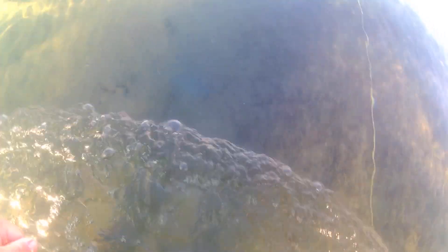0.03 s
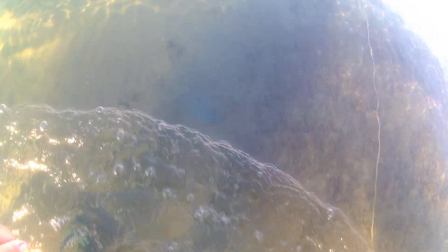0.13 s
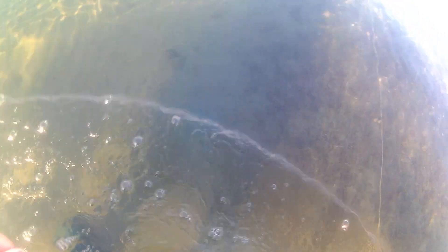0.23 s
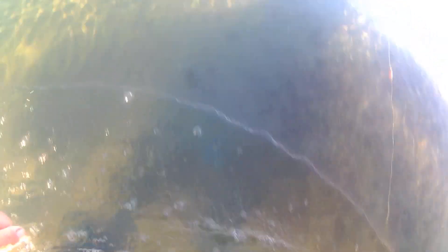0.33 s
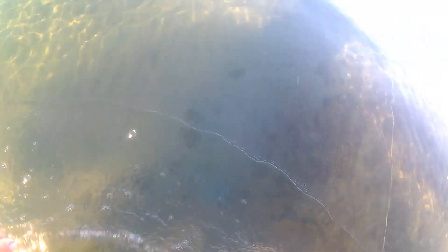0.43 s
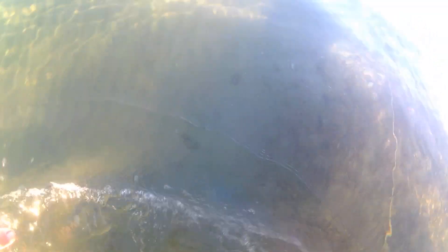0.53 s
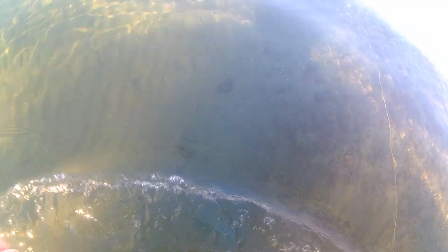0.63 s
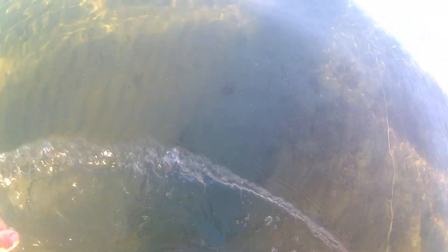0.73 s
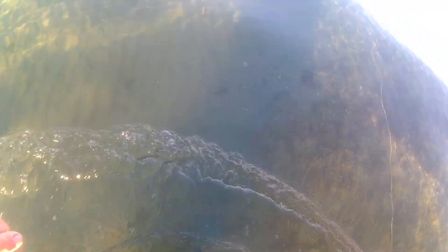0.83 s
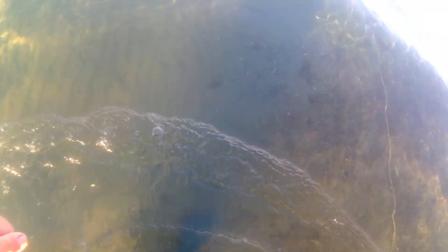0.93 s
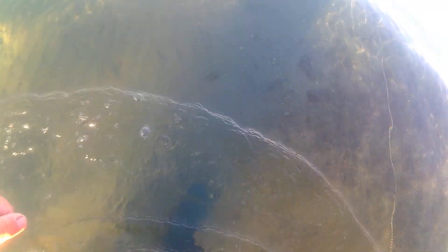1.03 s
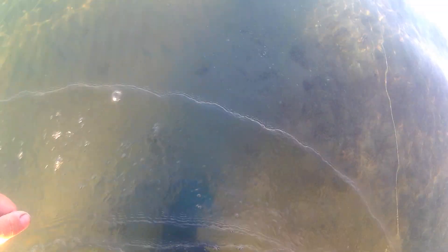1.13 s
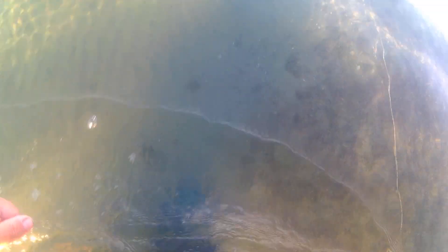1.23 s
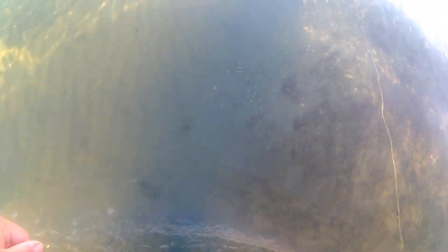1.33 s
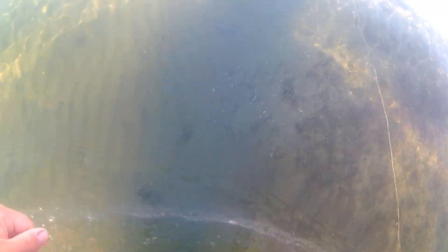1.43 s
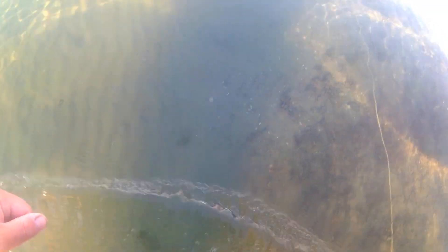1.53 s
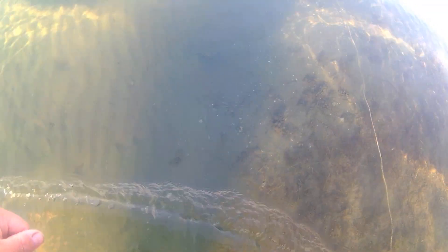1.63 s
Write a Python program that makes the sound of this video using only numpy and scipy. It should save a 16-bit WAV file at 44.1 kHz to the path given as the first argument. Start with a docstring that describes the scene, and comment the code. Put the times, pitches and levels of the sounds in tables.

```python
"""Small waves slap a waterproof camera held at the sea's surface, the microphone inside its housing.
Each slap is a dull thud, a hollow shell tone, a short ring of trapped air and a sharp click, all summed
from decaying modes, with a noisy crack and a little spray. Larger air pockets gulp and single bubbles drip.
Behind them are trickling water (random drops and noise), a low slosh, hiss and a faint hum and whine."""
import sys
import numpy as np
from scipy import signal
from scipy.fft import rfft, irfft, next_fast_len
from scipy.io import wavfile
from scipy.ndimage import map_coordinates

SR = 44100
rng = np.random.default_rng(int(sys.argv[2]) if len(sys.argv) > 2 else 0)


def digitize_waveform(pressure):
    """Quantize a signal to 16-bit integers and store it at the path in sys.argv[1].

    Rows of a 2-D input are taken as channels; values are limited to [-1, 1].
    """
    field = np.atleast_2d(pressure).T
    bounded = np.clip(field, -1, 1)
    quanta = np.round(bounded * 32767).astype(np.int16)
    wavfile.write(sys.argv[1], SR, quanta)


N = 74970  # length in samples, 1.7 s


def amp(db):
    """Decibels to gain."""
    return 10 ** (np.asarray(db) / 20)


def unit(x):
    """Scale to rms 1."""
    return x / np.sqrt(np.mean(x ** 2) + 1e-20)


def filtered(x, response):
    """Multiply the spectrum of x by a response of frequency."""
    size = next_fast_len(N + SR // 2)
    return irfft(rfft(x, size) * response(np.fft.rfftfreq(size, 1 / SR)), size)[:N]


def response_db(hz, points):
    """Level at each frequency, interpolated on a log scale between (Hz, dB) points."""
    point_hz, point_db = np.transpose(points)
    return np.interp(np.log(hz + 1), np.log(point_hz), point_db)


def coloured(x, points):
    """Shape x by a (Hz, dB) spectrum, at rms 1."""
    return unit(filtered(x, lambda hz: amp(response_db(hz, points))))


def noise(points):
    """Fresh noise with a (Hz, dB) spectrum, at rms 1."""
    return coloured(rng.standard_normal(N), points)


def causal(x, points):
    """Pass x through a minimum-phase filter with a (Hz, dB) response, so nothing sounds early."""
    size = 2048
    cepstrum = irfft(np.log(amp(response_db(np.fft.rfftfreq(size, 1 / SR), points))))
    # folding the cepstrum onto positive time gives minimum phase
    cepstrum[1:size // 2] *= 2
    cepstrum[size // 2 + 1:] = 0
    impulse_response = irfft(np.exp(rfft(cepstrum)))
    return signal.fftconvolve(x, impulse_response)[:N]


def wobble(rate):
    """A smooth random curve, rate knots a second."""
    return map_coordinates(rng.standard_normal(N // 20), [np.arange(N) * rate / SR])


def since(s):
    """Seconds since time s, zero before."""
    return np.maximum(np.arange(N) / SR - s, 0)


def swell(t, rise, t60):
    """Rise and exponential decay, peak 1."""
    envelope = (1 - np.exp(-t / rise)) * np.exp(-np.log(1000) * t / t60)
    return envelope / (envelope.max() + 1e-20)


def ring(t, hz, t60, cycles):
    """One resonant mode, building up over a few cycles and dying away."""
    return swell(t, cycles / hz, t60) * np.sin(2 * np.pi * hz * t)


# Spectrum of the recorder's hiss. Each row: frequency in Hz, relative level in dB.
HISS_SPECTRUM = [(100, -6.5), (2000, 3), (4000, -1), (8000, -3.5), (12000, -2.5), (15600, -3.5),
                 (16100, -26.5)]
HISS_DB = -67.5


def hiss():
    """The recorder's steady noise floor, as coloured noise."""
    return amp(HISS_DB) * noise(HISS_SPECTRUM)


# Faint electronic hum and whine. Each row: frequency in Hz, rms level in dB.
WHINE_TONES = [(60, -71.5), (9295, -88), (9374, -86), (9454, -83), (9534, -86.5)]
WHINE_DRIFT = 0.6  # phase wander in radians


def hum_and_whine():
    """Steady electronic sines whose phases wander slowly."""
    total = np.zeros(N)
    for hz, db in WHINE_TONES:
        start_phase = rng.uniform(0, 2 * np.pi)
        phase = 2 * np.pi * hz * since(0) + start_phase + WHINE_DRIFT * wobble(6.7)
        total += amp(db) * np.sqrt(2) * np.sin(phase)
    return total


# Spectrum of the water moving round the case. Each row: frequency in Hz, relative level in dB.
SLOSH_SPECTRUM = [(20, -7.5), (45, -2.5), (60, -4.5), (80, -6), (150, -5), (250, -11), (400, -12.5),
                  (900, -19), (2000, -27), (4000, -46)]
SLOSH_DB = -64


def slosh():
    """Even, low rumble of water moving round the case, as coloured noise."""
    return amp(SLOSH_DB) * noise(SLOSH_SPECTRUM)


# Level of the running water close along the case. Each row: time in seconds, level in dB.
TRICKLE_LEVEL = [(0, -72.5), (.15, -62.5), (.19, -63), (.28, -63.5), (.31, -58), (.5, -58.5), (.58, -67.5),
                 (0.701, -68), (.82, -58.5), (.89, -63.5), (.97, -59.5), (1.12, -63), (1.2, -67),
                 (1.28, -54.5), (1.33, -65.5), (1.46, -75.5), (1.55, -65.5), (1.611, -77), (1.7, -72)]
# Its spectrum at the microphone. Each row: frequency in Hz, relative level in dB.
TRICKLE_SPECTRUM = [(100, -21), (170, -6), (240, 3), (330, -20), (600, -22), (900, -2.5), (1150, -15),
                    (1450, -5), (1680, 7), (1820, -2.5), (2100, -22.5), (4000, -20), (7000, -33.5)]
DROPS_PER_S, DROP_SPREAD_DB = 840, 4
DROP_SHARE = 0.36  # drops' share of the power before colouring, the rest is smooth running water


def trickle():
    """Tiny drops as random impulses over the noise of running water, rising and falling in level."""
    falls = rng.random(N) < DROPS_PER_S / SR
    polarity = rng.choice([-1, 1], N)
    drops = falls * polarity * amp(DROP_SPREAD_DB * rng.standard_normal(N))
    running = rng.standard_normal(N)
    water = np.sqrt(DROP_SHARE) * unit(drops) + np.sqrt(1 - DROP_SHARE) * running
    s, db = np.transpose(TRICKLE_LEVEL)
    return amp(np.interp(since(0), s, db)) * coloured(water, TRICKLE_SPECTRUM)


# Single drips that ring only a small bubble. Each row: start in seconds, level in dB, pitch in Hz.
BUBBLE_DRIPS = [(.295, -49, 1707), (1.077, -45, 1688), (1.229, -53.5, 1730), (1.26, -47, 1547),
                (1.271, -42.5, 1716), (1.2985, -44.5, 1716)]
DRIP_T60_S, DRIP_RISE_CYCLES = 0.01237, 9.7


def drips():
    """Soft blips of single bubbles, each one short resonance."""
    return sum(amp(db) * ring(since(s), hz, DRIP_T60_S, DRIP_RISE_CYCLES) for s, db, hz in BUBBLE_DRIPS)


# Gulps of larger air pockets under the case.
# Each row: start in seconds, level in dB, pitch in Hz, decay time t60 in seconds.
AIR_GULPS = [(0.2289, -48.5, 245.5, 0.16), (0.2482, -40, 242.3, 0.0893), (0.3293, -38, 226.9, 0.091),
             (0.525, -49, 229.3, 0.0525), (0.6313, -48, 211, 0.0335), (1.2787, -33.5, 209.8, 0.0503),
             (1.2954, -39, 206.9, 0.104)]
GULP_RISE_CYCLES = 0.401


def gulps():
    """Low, round rings of air trapped by a wave, each one decaying mode."""
    return sum(amp(db) * ring(since(s), hz, t60, GULP_RISE_CYCLES) for s, db, hz, t60 in AIR_GULPS)


# Antiresonances of the housing. Each row: centre in Hz, width in Hz.
HOUSING_NOTCHES = [(681, 160), (1151, 110), (3281, 430), (5701, 590)]
STIFF_BELOW_HZ = 645  # the stiff shell radiates little below this


def through_housing(x):
    """The stiff case notches a few bands and cuts the lows."""
    for hz, width in HOUSING_NOTCHES:
        x = signal.lfilter(*signal.iirnotch(hz, hz / width, fs=SR), x)
    low_cut = signal.butter(4, STIFF_BELOW_HZ, "high", fs=SR, output="sos")
    return signal.sosfilt(low_cut, x)


# Modes of the housing, by part. Each row: frequency in Hz, relative level in dB, decay time t60 in seconds.
HOUSING_MODES = { "thud": [(110.4, -4, 0.029), (551, -12.5, 0.074), (629, -4.5, 0.1767)],
                 "shell": [(840.3, -9, 0.025), (930.1, -0.75, 0.01769)], "wall": [(1402.6, -1.25, 0.017),
                 (1566.7, 6.5, 0.012)], "click": [(2363.4, -8.5, 0.0072), (2655, -13, 0.0044),
                 (3439, -8.5, 0.0086), (3921, -6, 0.0092), (4000, -38.5, 0.0652), (4025, -11, 0.0093),
                 (4857, -15, 0.0125), (6383, -34, 0.0093), (7158, -20.5, 0.0029)]}
# Build-up of each part's rings and of the air ring, in cycles of the mode.
BUILD_UP_CYCLES = {"thud": 0.57, "shell": 3.1, "wall": 2.3, "air": 22, "click": 6.2}


def part_ring(t, part):
    """All the modes of one part of the housing, rung together."""
    return sum(amp(db) * ring(t, hz, t60, BUILD_UP_CYCLES[part]) for hz, db, t60 in HOUSING_MODES[part])


# Waves slapping the case, right at the microphone; all but the thud are levels before the filters.
# Each row: start in seconds, thud in dB, shell in dB, wall in dB, air ring in dB, air ring in Hz,
# click in dB, crack in dB.
WAVE_SLAPS = [(0.228, -45, -32, -44.5, -23.5, 1659, -59, -54.5),
              (0.2321, -62.5, -52, -49, -31, 1646, -65, -59),
              (0.2486, -62.5, -28, -31.5, -25, 1802, -36.5, -67),
              (0.2513, -47, -39.5, -42.5, -25.5, 1716, -63, -55.5),
              (0.3275, -43, -23, -29.5, -7, 1787, -13, -28),
              (0.5252, -62, -44.5, -43, -32.5, 1814.3, -47, -63.4),
              (0.631, -65, -50, -67.5, -61, 1684.7, -70.5, -77),
              (1.1624, -54, -22, -26, -24, 1802, -23.5, -32.5),
              (1.1681, -69, -43.5, -40, -39.5, 1715, -52, -56),
              (1.2774, -44.5, -27, -34, -39.5, 1792, -37, -41.5),
              (1.5596, -65.5, -37.3, -39.5, -28, 1859, -42, -49),
              (1.5651, -66.5, -57.5, -48.5, -45.5, 1787, -62, -71)]
# Response shaping the crack. Each row: frequency in Hz, gain in dB.
CRACK_RESPONSE = [(300.0, -34), (800.0, -30), (2200.0, 11.5), (5000.0, 1.85), (8000.0, -12),
                  (12000.0, -17.5), (16000.0, -15)]
# Spectrum of spray falling back after a slap. Each row: frequency in Hz, relative level in dB.
SPRAY_SPECTRUM = [(100, -28), (250, 3.5), (400, -16.5), (800, 1), (1100, -2), (1400, 10), (1800, 8.5),
                  (2150, -15.5), (4000, -21.5), (6000, -30.5)]
AIR_T60_S = 0.0114
CRACK_RISE_S, CRACK_T60_S = 0.00121, 0.0093
FIZZ_DB = 3  # noisy part of the crack, relative to the crack level
SNAP_DB, SNAP_DELAY_S = 21.5, 0.000801  # the water face closes on the case just after first touch
SPRAY_DB, SPRAY_T60_S = -42, 0.38  # level relative to the air ring's table level


def slaps():
    """Each slap rings the parts of the housing and a pocket of air, cracks, and leaves a little spray."""
    thud, knock, crack, spray_level = np.zeros((4, N))
    fizz = amp(FIZZ_DB) * rng.standard_normal(N)
    for s, thud_db, shell_db, wall_db, air_db, air_hz, click_db, crack_db in WAVE_SLAPS:
        t = since(s)
        first = int(s * SR)
        span = slice(first, first + SR // 2)  # the rings have died away within half a second
        thud[span] += amp(thud_db) * part_ring(t[span], "thud")
        for part, db in (("shell", shell_db), ("wall", wall_db), ("click", click_db)):
            knock[span] += amp(db) * part_ring(t[span], part)
        knock[span] += amp(air_db) * ring(t[span], air_hz, AIR_T60_S, BUILD_UP_CYCLES["air"])
        crack += amp(crack_db) * swell(t, CRACK_RISE_S, CRACK_T60_S) * fizz
        crack[int((s + SNAP_DELAY_S) * SR)] += amp(crack_db + SNAP_DB)
        spray_level += amp(air_db + SPRAY_DB) * swell(t, CRACK_RISE_S, SPRAY_T60_S)
    heard_through_case = through_housing(knock + causal(crack, CRACK_RESPONSE))
    return thud + heard_through_case + spray_level * noise(SPRAY_SPECTRUM)


def scene():
    """All the water, at one microphone."""
    return (slosh() + trickle() + drips() + gulps() + slaps())[None]


TOP_HZ = 16700  # band limit of the camera


def record(dry):
    """The camera adds hiss and a faint hum and whine, and keeps nothing above its band limit."""
    at_recorder = dry[0] + hiss() + hum_and_whine()
    return filtered(at_recorder, lambda hz: hz < TOP_HZ)[None]


dry = scene()
out = record(dry)
digitize_waveform(out)
```